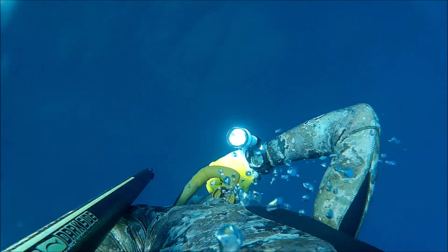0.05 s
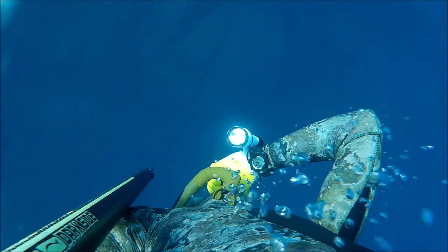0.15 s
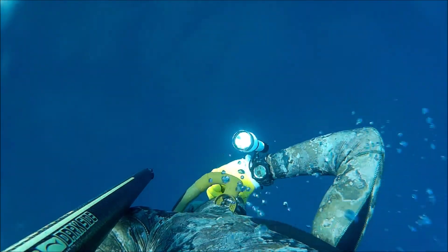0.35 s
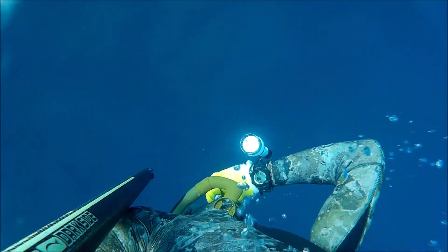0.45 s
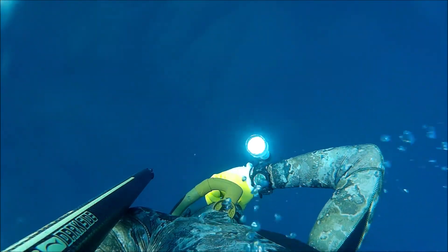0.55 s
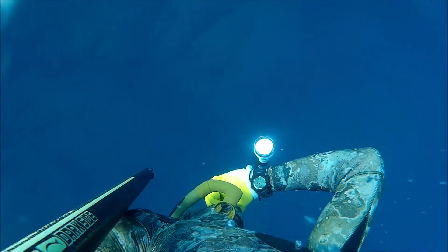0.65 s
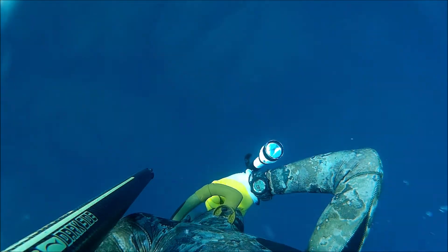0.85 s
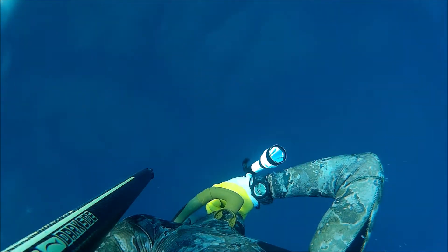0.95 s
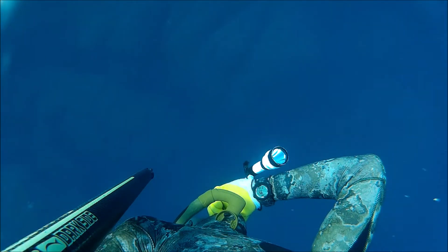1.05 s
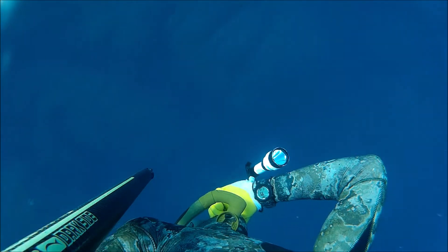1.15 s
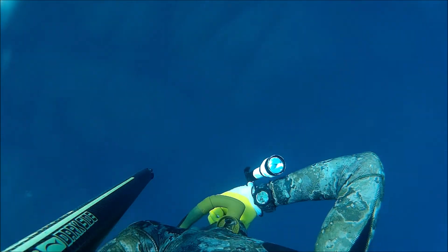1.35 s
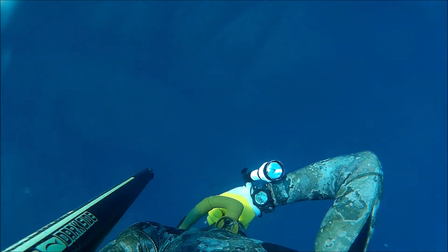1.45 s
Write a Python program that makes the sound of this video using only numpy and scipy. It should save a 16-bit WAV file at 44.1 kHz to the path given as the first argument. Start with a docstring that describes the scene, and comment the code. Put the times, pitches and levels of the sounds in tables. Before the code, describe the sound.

Air bubbles burst and gurgle briefly close to a diver underwater, then faint water wash and knocks

```python
"""Under water, close to a diver and a camera in its housing: a short burst of air breaks into bubbles.
Each near bubble is a dying tone with its own pitch, and it flicks the housing as it pinches off.
A swarm of small ones, made of many short random tones, gurgles around them, with brief noisy echoes.
Light knocks ring the housing, dull bumps are a few swelling cycles, and crackles are snips of noise.
Under it all lie a faint wash of water and a hiss, both made of coloured noise."""
import sys
import numpy as np
from scipy import signal
from scipy.fft import rfft, irfft, next_fast_len
from scipy.io import wavfile
from scipy.ndimage import map_coordinates

SR = 44100
rng = np.random.default_rng(int(sys.argv[2]) if len(sys.argv) > 2 else 0)


def wav_out(sig):
    """Save sig, one row per channel (or a flat mono array), as 16-bit PCM at SR to the path in sys.argv[1]."""
    wavfile.write(sys.argv[1], SR, np.round(np.clip(np.atleast_2d(sig).T, -1, 1) * 32767).astype(np.int16))


N = 66150  # samples: 1.5 s


def amp(db):
    """Turn decibels into a gain."""
    return 10 ** (np.asarray(db) / 20)


def unit(x):
    """Scale a sound to an rms of 1."""
    return x / np.sqrt(np.mean(x ** 2) + 1e-20)


def level(rows):
    """Draw a gain curve through (t/s, level/dB) points."""
    times, db = np.transpose(rows)
    return amp(np.interp(np.arange(N) / SR, times, db))


def wobble(rate, size):
    """A smooth random curve with `rate` random points a second."""
    points = rng.standard_normal(2048)
    return map_coordinates(points, [np.arange(size) * rate / SR], mode="wrap")


def filtered(x, response):
    """Multiply each frequency of x by the gain that response gives for it."""
    m = next_fast_len(N + SR // 2)  # spare room, so the end does not wrap onto the start
    gain = response(np.fft.rfftfreq(m, 1 / SR))
    return irfft(rfft(x, m) * gain, m)[:N]


def noise(spectrum):
    """Noise of rms 1, coloured by (f/Hz, level/dB) points; only their differences matter."""
    f, db = np.transpose(spectrum)

    def colour(hz):
        return amp(np.interp(np.log(hz + 1), np.log(f), db))

    return unit(filtered(rng.standard_normal(N), colour))


def add(track, s, sound):
    """Mix a sound into the track at time s, cutting what runs past the end."""
    part = track[max(0, round(s * SR)):][:len(sound)]
    part += sound[:len(part)]


ATTACK_S = 0.00044  # time constant of every bubble's onset
GLIDE_PER_S, WAVER = 0.16, 0.0067  # pitch rise and unsteadiness, as fractions of the pitch


def bubble(hz, t60):
    """A pocket of air pulsates and dies away, its pitch creeping up and wavering."""
    t = np.arange(SR // 6) / SR
    pitch = hz * (1 + GLIDE_PER_S * t + WAVER * wobble(190, size=len(t)))
    tone = np.sin(2 * np.pi * np.cumsum(pitch) / SR)
    return tone * amp(-60 * t / t60) * (1 - np.exp(-t / ATTACK_S))


# The tones in which the housing rings: f/Hz, level/dB (before scaling), time to fall 60 dB/s
HOUSING_MODES = [(359.4, -26, 0.27), (486, -18.5, .04), (680, -3.5, 0.048), (972, -4.5, 0.038),
                 (1590, -4, 0.018), (2088, -2.5, 0.011), (2550, -11.5, 0.03), (3077, -4, 0.0076),
                 (3744, -17.5, 0.015)]
MODE_SPREAD_DB = 3.6  # random change of each mode's level from blow to blow


def housing():
    """One blow on the housing, peak 1; its modes ring with slightly different levels each time."""
    t = np.arange(SR // 6) / SR
    ring = np.zeros(len(t))
    for k, (hz, db, t60) in enumerate(HOUSING_MODES):
        fade = amp(db + rng.normal(0, MODE_SPREAD_DB) - 60 * t / t60)
        ring += (-1) ** k * fade * np.sin(2 * np.pi * hz * t)  # every other mode is flipped
    return ring / np.abs(ring).max()


FLICK_DB = -12.5  # the housing's ring, relative to its bubble
# Single near bubbles: t/s, f/Hz (at the start), level/dB (before muffling), time to fall 60 dB/s
NEAR_BUBBLES = [ (0.1469, 754, -28.5, 0.045), (.1472, 724, -34.5, 0.12), (.1480, 975, -32.5, 0.15),
                (0.15, 2590, -38.5, 0.041), (0.154, 1118, -32.5, 0.06), (.2155, 1013, -23, 0.13),
                (0.2163, 2759, -10, 0.024), (0.2174, 4220, -34.5, 0.021), (0.2163, 2440, -18.5, 0.015),
                (.2183, 1547, -10, 0.03), (0.22, 3020, -29.5, 0.045), (.2281, 975, -15.5, 0.0083),
                (0.2278, 1884, -17.5, 0.0083), (.2290, 4250, -34, 0.025), (0.2307, 2553, -28, .04),
                (0.235, 1350, -19.5, 0.021), (0.237, 1086, -29, 0.053), (0.2449, 1650, -20.5, 0.0089),
                (0.246, 4020, -45.5, .025), (0.2455, 3275, -38, 0.037), (.2553, 1575, -14.5, 0.014),
                (.2570, 2103, -28.5, 0.029), (.2597, 1093, -31.5, 0.016), (0.265, 1500, -48, 0.03),
                (0.268, 2630, -41, 0.039), (0.2656, 4410, -47.5, 0.044), (.2739, 879, -28, .075),
                (.2780, 3860, -42, 0.019), (0.2774, 1620, -23, 0.032), (.2795, 2110, -38, 0.028),
                (0.3199, 3376, -31, 0.018), (.3220, 1880, -43, 0.06), (0.3462, 1764, -40.5, 0.087),
                (.3515, 1364, -35, .07), (0.3515, 4360, -30, 0.013), (0.3736, 3720, -30, 0.02),
                (0.3769, 1338, -33, 0.066), (0.3865, 1477, -37, 0.064), (0.4005, 1035, -28, 0.058),
                (0.401, 1791, -26.5, .035), (0.406, 1466, -34, 0.072), (.4380, 1574, -38, 0.12),
                (.4630, 2026, -49, 0.079), (0.4723, 871, -42, 0.078), (0.475, 2070, -40.5, 0.022),
                (.5865, 1657, -50.5, 0.086), (0.608, 1260, -43.5, 0.022), (.6080, 3450, -49, 0.026),
                (.6245, 4470, -39, 0.0072), (0.6435, 3740, -51.5, 0.033), (.6460, 2026, -34, 0.023),
                (0.7614, 1232, -42.5, 0.056)]


def bubbles():
    """The large, near bubbles; each flicks the housing as it breaks free."""
    out = np.zeros(N)
    for s, hz, db, t60 in NEAR_BUBBLES:
        sound = bubble(hz, t60) + amp(FLICK_DB) * housing()
        add(out, s, amp(db) * sound)
    return out


SWARM_PER_S = 1500  # chances for a bubble; those outside the pitch range are left out
SWARM_MIDDLE_HZ, SWARM_LOWEST_HZ, SWARM_HIGHEST_HZ = 1505, 786, 4500
SWARM_SPREAD = 0.53  # how widely the pitches scatter around the middle
SWARM_CYCLES = 25  # a bubble falls by 60 dB in this many cycles
SWARM_TILT = -0.89  # smaller bubbles are weaker, by this power of pitch
# Loudness of the swarm over time: t/s, level/dB
SWARM_LEVEL = [(.14, -67), (.2, -60), (.214, -49), (.218, -30.5), (.24, -32.5), (.251, -46), (.264, -29),
               (.283, -39), (.305, -57.5), (.35, -57), (.41, -51.5), (.47, -62.5), (.53, -65), (.62, -63),
               (.7, -66.5), (1.5, -72)]


def swarm():
    """Many small bubbles of random size; the smaller a bubble, the higher, shorter and weaker its tone."""
    out, t = np.zeros(N), np.arange(SR // 12) / SR
    chance = rng.random((4000, 4))
    for k, (when, size, strength, sign) in enumerate(chance[:int(SWARM_PER_S * N / SR)]):
        hz = SWARM_MIDDLE_HZ * (size / (1 - size)) ** (SWARM_SPREAD / 2)
        if SWARM_LOWEST_HZ < hz < SWARM_HIGHEST_HZ:
            fade = amp(-60 * t * hz / SWARM_CYCLES)
            ring = np.sin(2 * np.pi * hz * t) * fade * (1 - np.exp(-t / ATTACK_S))
            gain = amp(-12 * strength) * (hz / SWARM_MIDDLE_HZ) ** SWARM_TILT
            add(out, (k + when) / SWARM_PER_S, np.sign(sign - 0.5) * gain * ring)
    return unit(out) * level(SWARM_LEVEL)


SCATTER_T60_S = 0.11  # time for the echoes to fall 60 dB


def scatter(x):
    """A brief cloud of echoes off the diver and the bubbles: x smeared by a fading burst of noise."""
    t = np.arange(SR // 8) / SR
    tail = rng.standard_normal(len(t)) * amp(-60 * t / SCATTER_T60_S) * (1 - np.exp(-t / 0.001))
    return signal.fftconvolve(x, tail / np.linalg.norm(tail))[:N]


# Knocks on the housing: t/s, level/dB (peak, before muffling)
KNOCK_TIMES = [(.079, -51), (0.1467, -34), (.2163, -21.5), (.3194, -34), (.3515, -51), (0.3738, -36),
               (.6365, -47), (0.7597, -38.5), (0.9227, -32), (0.951, -47)]


def knocks():
    """Short, hard contacts that set the housing ringing."""
    out = np.zeros(N)
    for s, db in KNOCK_TIMES:
        add(out, s, amp(db) * housing())
    return out


# Dull bumps: t/s, f/Hz, level/dB (of the swell's top), length/s
SOFT_BUMPS = [(0.215, 44.3, -43.5, 0.05), (.216, 116, -41.5, 0.026), (0.991, 129, -32.5, 0.031),
              (0.995, 218, -41.5, 0.018), (1.004, 208.5, -50.5, 0.053), (1.46, 676, -49.5, 0.019)]


def bumps():
    """Soft pushes on the camera: a few cycles that swell and fade."""
    out = np.zeros(N)
    for s, hz, db, length in SOFT_BUMPS:
        t = np.arange(int(length * SR)) / SR
        swell = np.sin(np.pi * t / length) ** 2
        add(out, s, amp(db) * swell * np.sin(2 * np.pi * hz * t))
    return out


TICK_T60_S = 0.0057  # time for the noise to fall 60 dB, before the filter
TICK_LOW_HZ, TICK_HIGH_HZ = 2110, 4780
# Tiny sharp crackles in the water: t/s, level/dB (peak)
CRACKLES = [(.079, -44), (0.197, -45), (0.3198, -44), (0.3535, -49), (.369, -37), (0.4002, -41),
            (.6245, -47), (0.6458, -40.5), (0.747, -53), (1.1, -47), (1.164, -47.5), (1.195, -48.5),
            (1.35, -48), (1.446, -51)]


def ticks():
    """Faint, bright snaps without a clear pitch: very short bursts of noise in a band."""
    out, t = np.zeros(N), np.arange(SR // 30) / SR
    band = signal.butter(2, [TICK_LOW_HZ, TICK_HIGH_HZ], "band", fs=SR, output="sos")
    for s, db in CRACKLES:
        burst = rng.standard_normal(len(t)) * amp(-60 * t / TICK_T60_S)
        snap = signal.sosfilt(band, burst)
        add(out, s, amp(db) * snap / np.abs(snap).max())
    return out


# Colour of the wash: f/Hz, level/dB (relative)
WASH_COLOUR = [(20, -77.5), (45, -81.5), (80, -80.5), (160, -87), (250, -89.5), (320, -86.5), (440, -91.5),
               (660, -88), (830, -103.5), (1500, -103), (2200, -110), (5000, -122)]
# Loudness of the wash over time: t/s, level/dB
WASH_LOUDNESS = [(0, -61), (.3, -52.5), (.6, -57.5), (.85, -58), (1.1, -59.5), (1.3, -56), (1.5, -56)]


def wash():
    """Water washes unevenly around the housing: mostly low noise with a wobbling level."""
    unevenness = amp(1.4 * wobble(19, size=N))  # spread in dB, points per second
    return noise(WASH_COLOUR) * level(WASH_LOUDNESS) * unevenness


# Colour of the hiss: f/Hz, level/dB (relative)
HISS_COLOUR = [(100, -38), (1500, -5), (2100, -0.5), (3100, 3), (5500, -1.5), (9000, -4), (14500, -6),
               (15800, -13.5)]
# Loudness of the hiss, which dips briefly once: t/s, level/dB
HISS_LOUDNESS = [(0, -68), (.19, -64.5), (.27, -62), (.5, -65), (.63, -62.5), (.7, -67), (.8, -67),
                 (.825, -72), (.85, -66), (1.5, -68)]


def hiss():
    """A fine, bright hiss: noise that is weak in the lows."""
    return noise(HISS_COLOUR) * level(HISS_LOUDNESS)


MUFFLE_HZ = 4350  # the housing dulls the bubbles and knocks above this
SCATTER_DB = -14  # the echoes, relative to the bubbles


def scene():
    """Muffled bubbles, echoes and knocks, plus crackles, bumps and background, in mono."""
    air = bubbles() + swarm()
    muffle = signal.butter(2, MUFFLE_HZ, fs=SR, output="sos")
    heard = signal.sosfilt(muffle, air + amp(SCATTER_DB) * scatter(air) + knocks())
    return (heard + ticks() + bumps() + wash() + hiss())[None]


TOP_HZ = 15700


def record(dry):
    """The camera keeps nothing above its band limit."""
    return np.array([filtered(channel, lambda hz: hz < TOP_HZ) for channel in dry])


dry = scene()
out = record(dry)
wav_out(out)
```